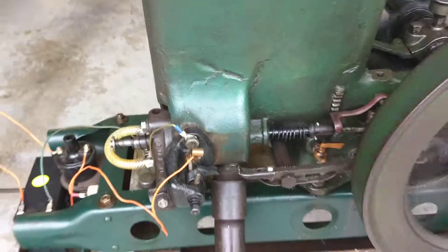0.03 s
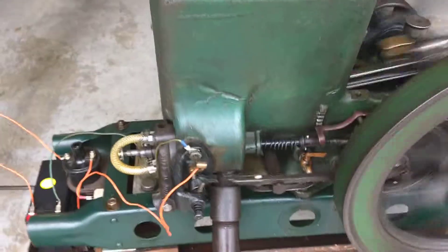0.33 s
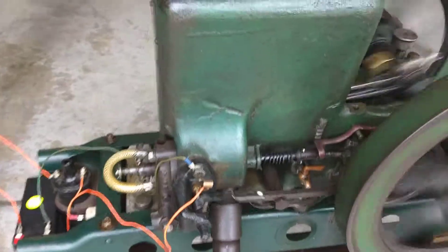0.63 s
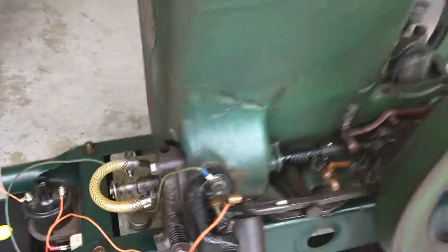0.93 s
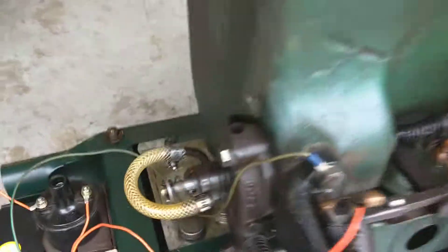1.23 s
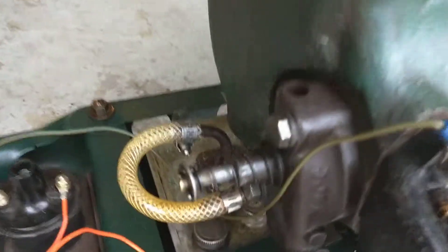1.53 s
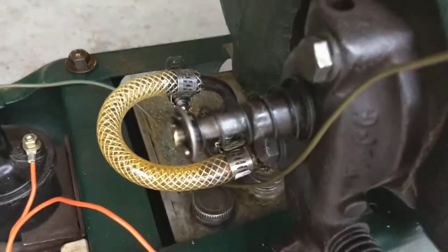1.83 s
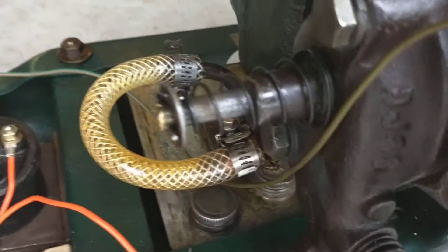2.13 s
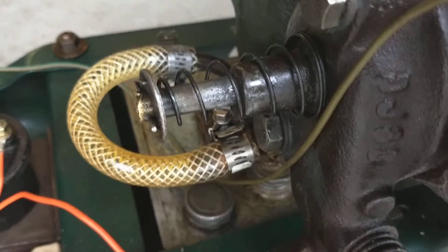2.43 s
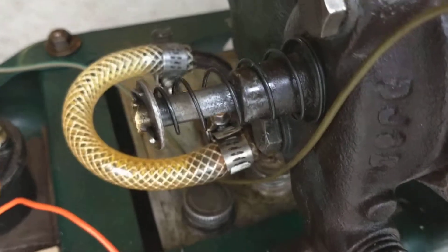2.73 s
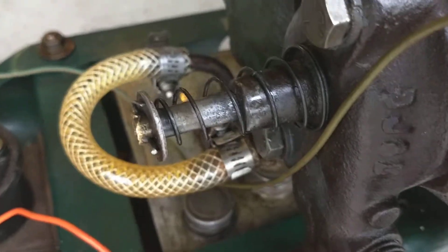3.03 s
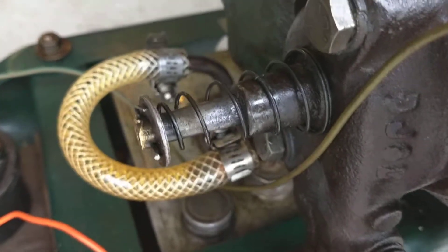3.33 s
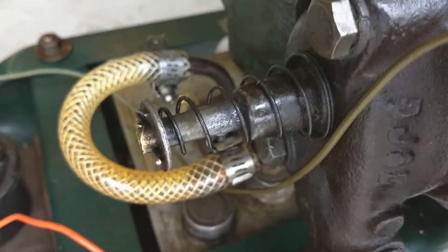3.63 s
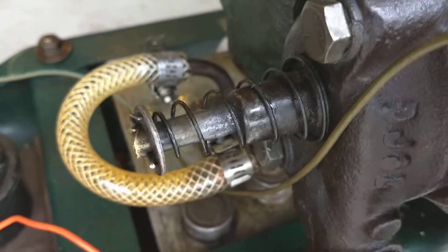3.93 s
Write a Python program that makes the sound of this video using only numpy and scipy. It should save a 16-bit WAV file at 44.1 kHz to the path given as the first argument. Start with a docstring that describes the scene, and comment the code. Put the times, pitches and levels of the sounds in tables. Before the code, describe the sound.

A slow antique engine knocks and clicks steadily over a gear rumble. At regular intervals a fluttering suck of air leads to a clank and a sharp pop, heard up close with a short echo from hard walls.

```python
"""On a workshop's concrete floor, an antique hit-and-miss engine runs slowly, close by.
Every fourth turn it sucks air through a fluttering valve, ignites with a clank and lets out
one sharp exhaust pop. In between it coasts: the rod knocks at each half turn, the latch clacks,
the valve gear ticks and the gears rumble. The hard walls add a short echo."""
import sys
import numpy as np
from scipy import signal
from scipy.fft import rfft, irfft, next_fast_len
from scipy.io import wavfile

SR = 44100
rng = np.random.default_rng(int(sys.argv[2]) if len(sys.argv) > 2 else 0)


def digitize_waveform(pressure):
    """Quantize a signal to 16-bit integers and store it at the path in sys.argv[1].

    Rows of a 2-D input are taken as channels; values are limited to [-1, 1].
    """
    field = np.atleast_2d(pressure).T
    bounded = np.clip(field, -1, 1)
    quanta = np.round(bounded * 32767).astype(np.int16)
    wavfile.write(sys.argv[1], SR, quanta)


N = 176400
TIME = np.arange(N) / SR
SIZE = next_fast_len(N + SR, real=True)
HZ = np.arange(SIZE // 2 + 1) * SR / SIZE
CUTOFF_HZ = 15850

# The exhaust valve opens: t/s, pulse level/dB, pulse left minus right/dB, gas jet level/dB
EXHAUST_POPS = [(0.4385, -6, 2, -15), (1.7720, -3, -6, -13), (3.125, -2.5, -6.5, -14)]


def exhaust_pulses():
    """The opening exhaust valve gives the air one quick push and pull."""
    width_s, low_cut_hz = 0.00039, 210
    pulses = 0
    for start, db, pan_db, _ in EXHAUST_POPS:
        age = (TIME - start) / width_s
        left_right = amp([[db + pan_db / 2], [db - pan_db / 2]])
        pulses -= age * np.exp((1 - age ** 2) / 2) * left_right
    return signal.sosfilt(signal.butter(1, low_cut_hz, "high", fs=SR, output="sos"), pulses)


def exhaust_gas():
    """A jet of gas sputters, the pipe booms with sinking pitch, and spent gas hisses out."""
    # Tone of the jet: f/Hz, level/dB
    jet_tone = [(40, -12), (140, 7.5), (350, -0.5), (520, -5), (700, 0.5), (1000, -2.5), (1500, 0.5),
                (2200, -3), (3100, -6.5), (3570, -6.5), (4100, -8), (5500, -3), (8000, -10.5), (10500, -9),
                (13000, -7.5), (15300, 2)]
    # Tone of the hiss: f/Hz, level/dB
    hiss_tone = [(100, -9), (1000, -4), (2500, -1), (3700, -4.5), (5500, -3.5), (8000, -6.5), (10000, -9.5),
                 (12500, -5), (15000, -0.5)]
    start_hz, end_hz, sink_s = 186, 125, 0.02  # pitch of the pipe
    jets = [(start, db) for start, _, _, db in EXHAUST_POPS]
    jet = bursts(jets, jet_tone, rise_s=0.0044, hold_s=0.0072, fade_s=0.053)
    hisses = [(start, db - 25.5) for start, db in jets]
    hiss = bursts(hisses, hiss_tone, rise_s=0.025, hold_s=0.043, fade_s=0.77)
    boom = 0
    for start, db, _, _ in EXHAUST_POPS:
        hz = end_hz + (start_hz - end_hz) * np.exp(-np.maximum(TIME - start, 0) / sink_s)
        phase = 2 * np.pi * np.cumsum(hz * (TIME > start)) / SR
        boom += amp(db - 29.5) * swell(start, rise_s=0.0086, hold_s=0.01, fade_s=0.18) * np.sin(phase)
    return jet * flicker(spread_db=2.35, hz=400) + boom + hiss


def ignition():
    """A clank, then the fuel burns behind the iron wall."""
    # Firings: t/s, clank level/dB, burn level/dB
    firings = [(0.364, -21.5, -26.5), (1.697, -24, -25.5), (3.0496, -22, -23.5)]
    # Tone of the clank: f/Hz, level/dB
    clank_tone = [(100, -52), (500, 14.5), (1500, -15.5), (2600, 12), (3800, 13), (5000, 6.5), (8000, 0),
                  (11000, -2), (15000, 7)]
    # Tone of the muffled burning: f/Hz, level/dB
    burn_tone = [(60, -13), (200, -1), (320, 2.5), (800, 4.5), (1150, 9), (1650, 5.5), (2300, 0),
                 (3700, -11), (6000, -15.5), (15000, -26)]
    clanks = [(start, db) for start, db, _ in firings]
    burns = [(start + 0.0013, db) for start, _, db in firings]
    clank = bursts(clanks, clank_tone, rise_s=0.00034, hold_s=0.0011, fade_s=0.096)
    return clank + bursts(burns, burn_tone, rise_s=0.015, hold_s=0.013, fade_s=0.26)


def intake():
    """Air rushes in with a low gulp past a spring-loaded valve, which flutters and buzzes."""
    # Breaths of air: t/s, length/s, air level/dB, buzz level/dB, buzz f/Hz, gulp level/dB
    breaths = [(.195, 0.082, -29.5, -30, 2620, -45), (1.524, 0.068, -27, -28.5, 2630, -36.5),
               (2.875, 0.062, -24, -24, 2660, -32.5), (3.884, 0.059, -28, -24, 2674, -33.5)]
    # Tone of the rushing air: f/Hz, level/dB
    air_tone = [(40, -20), (85, -14), (140, -1.5), (200, -6.5), (400, 2), (650, -13.5), (1700, 1.5),
                (2200, -3), (3200, -13.5), (3850, 3.5), (4500, -13), (5600, -8), (7000, -14), (10000, -20),
                (12400, -10), (15500, -13)]
    # Tone of the gulp: f/Hz, level/dB
    gulp_tone = [(30, -30), (60, -4), (84, 3), (105, -5.5), (128, 2), (190, -13.5), (400, -20), (1500, -54)]
    flutter_hz, flutter_depth = 45.4, 0.66
    air, buzz, gulp = 0, 0, 0
    for start, length, air_db, buzz_db, buzz_hz, gulp_db in breaths:
        flutter = 1 - flutter_depth * np.cos(2 * np.pi * flutter_hz * (TIME - start))
        flow = swell(start, rise_s=0.033, hold_s=length - 0.033, fade_s=0.12)
        air += amp(air_db) * flow * (0.88 + 0.29 * flutter)
        gulp += amp(gulp_db) * flow
        buzz_shape = swell(start, rise_s=0.011, hold_s=length - 0.015, fade_s=0.03)
        buzz += amp(buzz_db) * flutter * buzz_shape * band_noise(buzz_hz, width_hz=178)
    rough = flicker(spread_db=3, hz=160)
    return colour(noise() * air * rough, air_tone) + buzz * rough + colour(noise() * gulp, gulp_tone)


def rod():
    """Each knock of the rod rings the iron body, then the gears take up their slack in two bumps."""
    # Knocks at the half turns: t/s, level/dB
    knocks = [(.001, -26.5), (.169, -26), (.669, -36.5), (.823, -31.5), (.989, -31), (1.155, -29),
              (1.328, -27.5), (1.499, -25.5), (2.009, -32.5), (2.164, -29.5), (2.333, -29), (2.499, -27),
              (2.673, -25), (2.848, -21.5), (3.357, -34), (3.522, -28), (3.690, -25), (3.855, -25)]
    # Tone of a knock: f/Hz, level/dB
    knock_tone = [(50, -30), (200, -10.5), (305, 9), (420, -0.5), (640, 0), (900, 0), (1020, 7), (1300, 1),
                  (1500, -2.5), (1680, 6.5), (2100, -1), (2420, 11), (3100, -16.5), (3750, -5), (4600, -20),
                  (7000, -24.5), (15000, -27.5)]
    # Notes of the iron body: f/Hz, level relative to the knock/dB, fade time/s
    iron_notes = [(306, -6, 0.18), (786.5, -5, 0.17), (1628, -10.5, 0.085), (2420, -24, .05)]
    # Gear bumps after a knock: delay/s, level relative to the knock/dB
    slack = [(0.066, -9), (0.126, -18)]
    # Tone of a bump: f/Hz, level/dB
    bump_tone = [(100, -25), (330, -11), (600, -2), (1000, 2.5), (1400, -3.5), (1750, -8), (2800, -7.5),
                 (4000, -21), (9000, -43), (15000, -25)]
    knock = bursts(knocks, knock_tone, rise_s=0.0038, hold_s=0.0066, fade_s=0.1)
    strikes = [(start + 0.002936, db) for start, db in knocks]
    iron = sum(amp(db) * ring(strikes, hz, fade_s) for hz, db, fade_s in iron_notes)
    bumps = [(start + delay, db + bump_db) for start, db in knocks for delay, bump_db in slack]
    return knock + iron + bursts(bumps, bump_tone, rise_s=0.0026, hold_s=0.0066, fade_s=0.028)


def linkage():
    """The latch clacks, the valve gear ticks and rings its lever and spring, and the frame thuds."""
    # Latch clacks, about one a turn: t/s, level/dB
    clacks = [(.012, -26), (.683, -38), (1.005, -32.5), (1.344, -26.5), (1.599, -26.5), (2.020, -33.5),
              (2.344, -28.5), (2.688, -25), (2.949, -22.5), (3.375, -33.5), (3.703, -28.5), (3.957, -25)]
    # Tone of a clack: f/Hz, level/dB
    clack_tone = [(200, -28), (1500, 0), (2700, 1.5), (3700, 4), (4600, 1.5), (5500, 1), (8000, -4.5),
                  (11500, -2.5), (15000, 0.5)]
    # Valve gear hits: t/s, tick level/dB, lever level/dB, low and high spring note levels/dB
    hits = [(0.106, -39, -31, -32.5, -47), (.158, -33.5, -30, -40, -54), (.186, -34, -36, -34, -50),
            (.766, -42, -40, -38.5, -53), (.816, -39.5, -38.5, -42, -58), (0.94, -42, -41, -52, -53),
            (1.092, -41, -35.5, -39, -46), (1.14, -43.5, -38.5, -61, -57), (1.276, -40, -64, -64, -58),
            (1.435, -43, -37, -46, -53), (1.488, -35.5, -29.5, -45, -52), (2.104, -41, -40.5, -52, -50),
            (2.158, -35.5, -41, -48, -61), (2.28, -37, -67, -62, -57), (2.433, -35.5, -35, -47, -47),
            (2.491, -32.5, -33, -40, -47.5), (2.621, -33.5, -64, -61.5, -49), (2.781, -31.5, -37, -42, -40),
            (2.838, -30, -28, -44, -47), (3.460, -39.5, -49, -58, -54), (3.512, -37, -47, -48.5, -60),
            (3.64, -37, -57, -56, -54), (3.794, -34.5, -35, -48, -46.5), (3.845, -31, -36, -40, -55),
            (3.872, -31, -49, -54, -42)]
    # Tone of a tick: f/Hz, level/dB
    tick_tone = [(300, 4), (1200, -5), (2500, -8), (3500, 7.5), (4600, 5.5), (5800, 1.5), (6600, 6.5),
                 (7400, -3), (9000, -4), (12000, -7.5), (15000, 0.5)]
    # Tone of the lever: f/Hz, level/dB
    lever_tone = [(200, -26), (500, -10), (1000, 5.5), (1400, 3), (2000, -5), (2700, 1.5), (3500, -7.5),
                  (5000, -12.5), (15000, -37)]
    # Low and high note of the spring: f/Hz, fade time/s
    spring_notes = [(3350, 0.12), (5870, 0.18)]
    # Dull thuds of the frame: t/s, level/dB
    thuds = [(.068, -45), (1.236, -33.5)]
    ticks = [(start, db) for start, db, *_ in hits]
    lever_hits = [(start, db) for start, _, db, *_ in hits]
    clack = bursts(clacks, clack_tone, rise_s=0.0014, hold_s=0.0028, fade_s=0.048)
    tick = bursts(ticks, tick_tone, rise_s=0.00082, hold_s=0.0011, fade_s=0.043)
    lever = bursts(lever_hits, lever_tone, rise_s=0.00083, hold_s=0.005, fade_s=0.15)
    spring = 0
    for note, (hz, fade_s) in enumerate(spring_notes):
        strikes = [(start, note_db[note]) for start, _, _, *note_db in hits]
        spring += ring(strikes, hz, fade_s)
    grain = flicker(spread_db=2, hz=500)
    return (clack + tick) * grain + lever + spring + ring(thuds, hz=170, fade_s=0.06)


def valve_seat():
    """The metal rim under the valve sings when it is struck or gas passes."""
    # Moments of singing: t/s, length/s, level/dB
    rings = [(.008, 0.018, -35), (0.229, 0.03, -31.5), (0.353, 0.019, -35), (0.438, 0.0044, -21.5),
             (1.764, 0.014, -32)]
    level = sum(amp(db) * swell(start, rise_s=0.0024, hold_s=length, fade_s=0.1)
                for start, length, db in rings)
    return band_noise(hz=3660, width_hz=460) * level


def gears():
    """The gears rumble unevenly while their loose teeth rattle."""
    # Loudness of the gears over time: t/s, level/dB
    loudness = [(0.0, -37.5), (0.3, -39.5), (0.43, -40), (0.51, -47.5), (0.78, -45), (1.59, -34.5),
                (1.65, -37), (1.82, -41.5), (2.04, -41.5), (2.39, -38), (2.96, -33), (3.17, -41.5),
                (3.48, -42), (4.0, -37)]
    # Tone of the rumble: f/Hz, level/dB
    rumble_tone = [(25, -46), (60, -11), (130, -4), (220, -10), (330, 0.5), (600, 0.5), (800, 4.5),
                   (900, 2), (1120, 3), (1400, -2), (1700, -0.5), (2200, -8.5), (2800, -6), (4000, -28),
                   (6000, -21.5), (9000, -41), (15000, -33)]
    # Tone of the rattle: f/Hz, level/dB
    rattle_tone = [(300, -25), (900, -1), (1600, 9.5), (2700, -15), (3700, 0.5), (5000, -23), (9000, -39),
                   (15000, -34)]
    touches_per_s, touch_fade_s = 51, 0.015
    level = amp(np.interp(TIME, *np.transpose(loudness)))
    rumble = colour(noise() * level * amp(-1) * flicker(spread_db=2.22, hz=41.7), rumble_tone)
    touches = (rng.random(N) < touches_per_s / SR) * amp(-1.5 + 5.5 * rng.random(N))
    fading = signal.lfilter([1], [1, -amp(-60 / (touch_fade_s * SR))], touches + 1e-18)
    return rumble + colour(noise() * fading * level, rattle_tone)


def room(sound):
    """The hard walls throw the sound back as a smooth, fading echo."""
    # Tone of the echo: f/Hz, level/dB
    echo_tone = [(50, -9), (300, -0.5), (1000, -12), (3000, -0.5), (6000, 5.5), (15000, -2)]
    shape = swell(0.0076, rise_s=0.0042, hold_s=0, fade_s=0.9)
    tail = colour(noise() * shape, echo_tone)[:, :SR]
    tail /= np.sqrt(np.sum(tail ** 2, axis=1, keepdims=True))
    return signal.fftconvolve(sound, tail, axes=1)[:, :N]


def microphones(sound):
    """Two microphones hear some pitches in step and others out of step, which widens the sound."""
    # How far out of step the low pitches are: f/Hz, half phase angle/rad
    bass_angle = [(60, 1.3), (130, 0.86), (280, 0.42), (500, 0.11), (1100, 0.033)]
    # Lean to one side: f/Hz, left minus right/dB
    balance = [(60, -0.5), (200, -3), (500, -2), (1000, 0.5), (4000, -2.3), (8000, -1.5), (13000, 3.5)]
    repeat_hz, likeness, leak = 2199, 0.33, 0.18
    first, second = rfft(sound, SIZE)
    angle = np.where(HZ < repeat_hz / 2, at_hz(bass_angle), np.pi * (HZ / repeat_hz - 0.5))
    # Mid is what left and right share; side is what sets them apart.
    mid = first * np.hypot(np.cos(angle), leak / 2)
    side = -1j * likeness * first * np.sin(angle) * np.tanh(10 * np.cos(angle))
    side += second * np.hypot(np.sqrt(1 - likeness ** 2) * np.sin(angle), leak)
    lean = amp(at_hz(balance) / 2)
    return irfft(np.array([(mid + side) * lean, (mid - side) / lean]), SIZE)[:, :N]


def amp(db):
    """Turn decibels into a factor to multiply by."""
    return 10 ** (np.asarray(db) / 20)


def at_hz(points):
    """Read a table at every frequency."""
    hz, value = np.transpose(points)
    return np.interp(np.log(HZ + 1), np.log(hz), value)


def colour(sound, tone):
    """Filter a sound to the given tone; white noise keeps its power below the cutoff."""
    gain = amp(at_hz(tone))
    gain /= np.sqrt(np.mean(gain ** 2 * (HZ < CUTOFF_HZ)))
    # Folding makes the filter ring only after a hit, never before it.
    cepstrum = irfft(np.log(gain), SIZE)
    fold = 1 + np.sign(SIZE / 2 - np.arange(SIZE)) * (np.arange(SIZE) > 0)
    return irfft(rfft(sound, SIZE) * np.exp(rfft(cepstrum * fold)), SIZE)[..., :N]


def noise():
    """Two unrelated white noises."""
    return rng.standard_normal((2, N))


def band_noise(hz, width_hz):
    """Noise gathered around one pitch, with a typical size of 1."""
    edges = [hz - width_hz / 2, hz + width_hz / 2]
    band = signal.sosfilt(signal.butter(2, edges, "band", fs=SR, output="sos"), noise())
    return band / band.std()


def flicker(spread_db, hz):
    """A loudness factor that wavers at random, up to about hz times a second."""
    drift = signal.sosfilt(signal.butter(2, hz, fs=SR, output="sos"), rng.standard_normal(N + SR))[SR:]
    return amp(spread_db * drift / drift.std())


def swell(start, rise_s, hold_s, fade_s):
    """Rise, hold and die away; a fade time is the time taken to drop by 60 dB."""
    age = TIME - start
    return np.clip(age / rise_s, 0, 1) * amp(-60 * np.clip((age - rise_s - hold_s) / fade_s, 0, 2))


def bursts(hits, tone, rise_s, hold_s, fade_s):
    """Clattering metal or rushing gas: one burst of noise for each hit (t/s, level/dB)."""
    power, shape = np.zeros(N), swell(0, rise_s, hold_s, fade_s) ** 2
    for start, db in hits:
        sample = int(start * SR)
        power[sample:] += amp(db) ** 2 * shape[:N - sample]
    return colour(noise() * np.sqrt(power), tone)


def ring(hits, hz, fade_s):
    """One pure, fading note, struck at each hit (t/s, level/dB)."""
    clicks = np.zeros((2, N)) + 1e-18
    for start, db in hits:
        clicks[:, int(start * SR)] += amp(db)
    decay, step = amp(-60 / (fade_s * SR)), 2 * np.pi * hz / SR
    return signal.lfilter([0, np.sin(step)], [1, -2 * decay * np.cos(step), decay ** 2], clicks)


def scene():
    """The engine in its workshop."""
    works = ignition() + intake() + rod() + linkage()
    gas = exhaust_gas()
    echo = room(amp(-12) * works + amp(-18.5) * gas)
    return microphones(works + valve_seat() + gas + gears() + echo) + exhaust_pulses()


def record(dry):
    """Clip peaks at full scale and cut the highest treble."""
    treble_cut = signal.ellip(12, 0.1, 70, CUTOFF_HZ, fs=SR, output="sos")
    return signal.sosfilt(treble_cut, np.clip(dry, -1, 1))


dry = scene()
out = record(dry)
digitize_waveform(out)
```